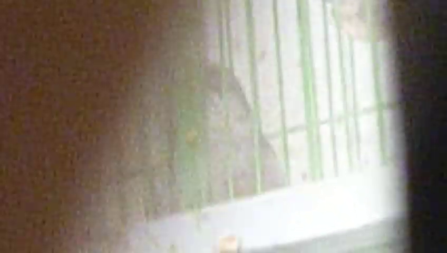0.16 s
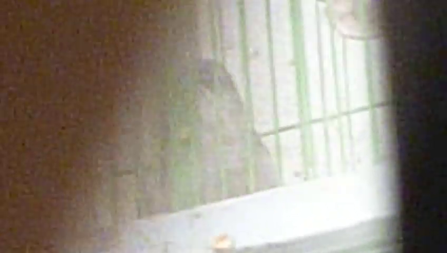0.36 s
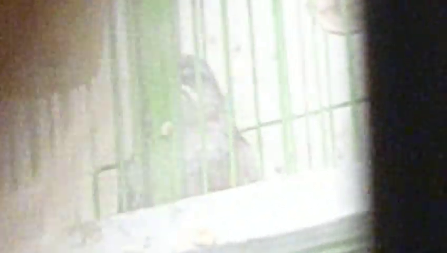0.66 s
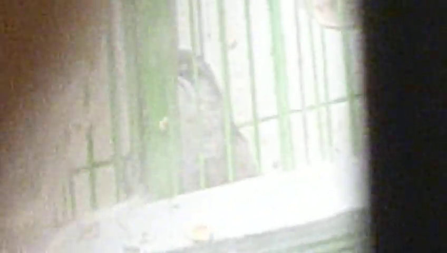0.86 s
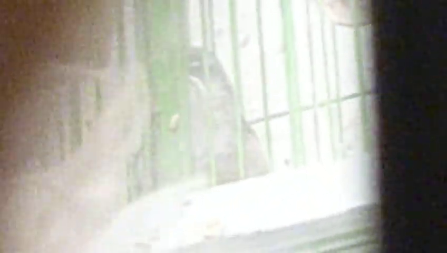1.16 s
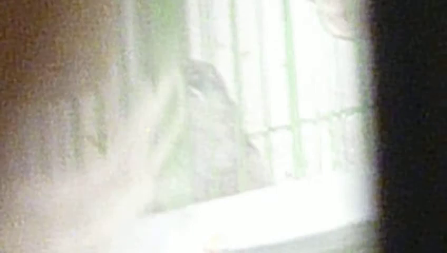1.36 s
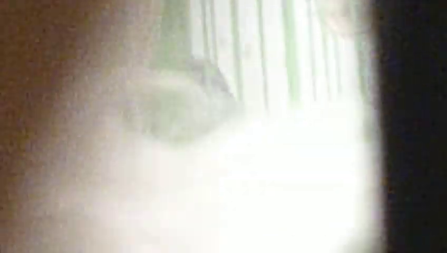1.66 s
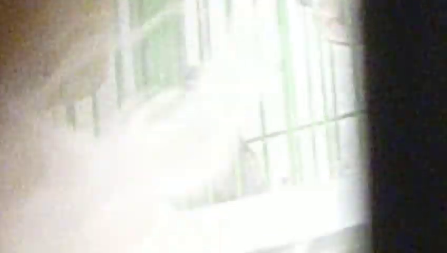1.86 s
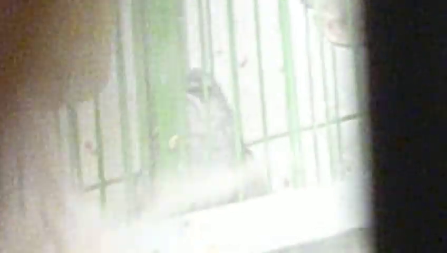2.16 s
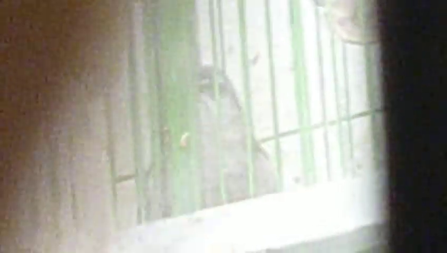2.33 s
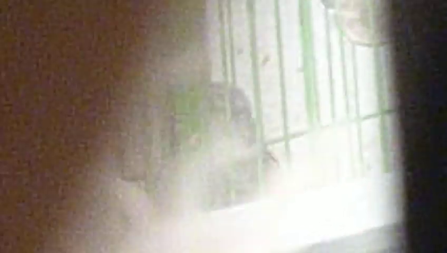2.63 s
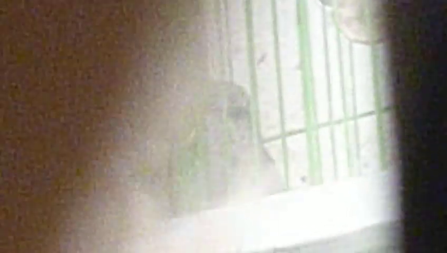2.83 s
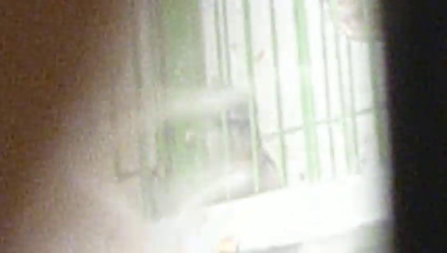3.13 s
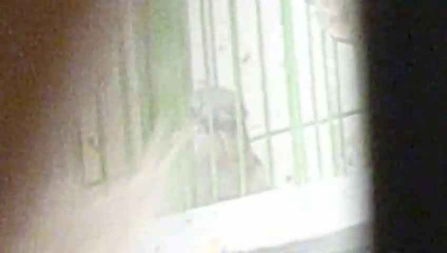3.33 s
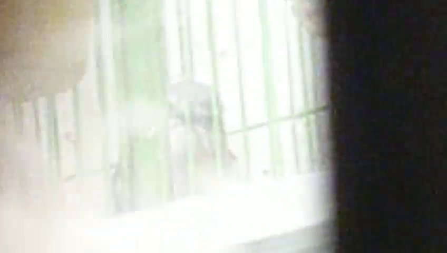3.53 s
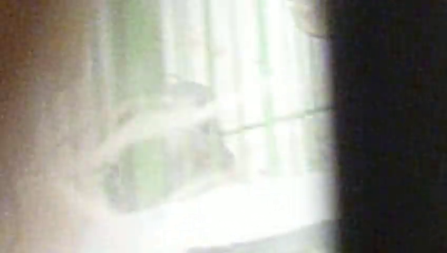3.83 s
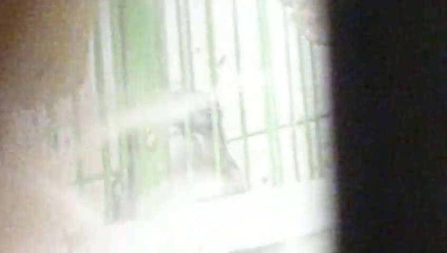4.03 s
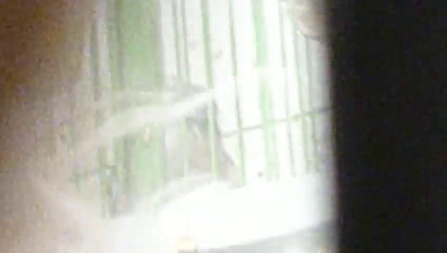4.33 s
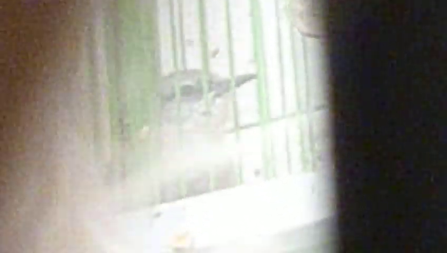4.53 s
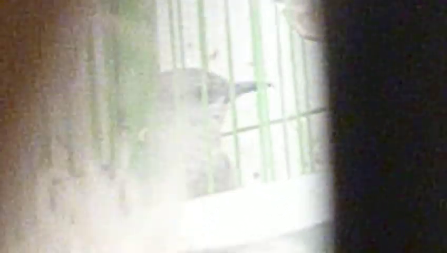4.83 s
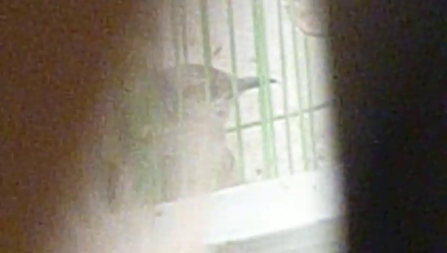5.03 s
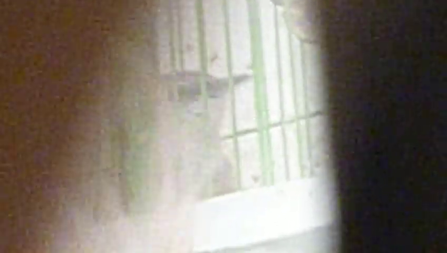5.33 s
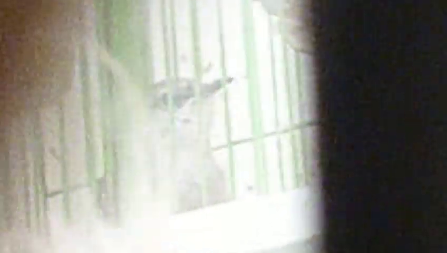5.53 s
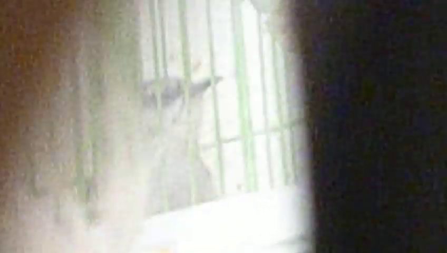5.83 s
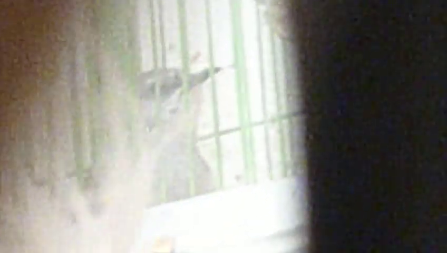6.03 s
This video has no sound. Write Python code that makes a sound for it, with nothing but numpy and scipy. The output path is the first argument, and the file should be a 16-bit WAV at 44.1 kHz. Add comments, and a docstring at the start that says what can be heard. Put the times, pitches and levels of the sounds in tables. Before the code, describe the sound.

Soft, varied chirps and warbles from a caged songbird, each figure repeated a few times, with slight room echo and constant background hiss.

```python
"""Mockingbird in a hard-walled room

A caged mockingbird sings softly a few metres away, repeating each motif a few times: down-slurs and
rasps, arches, dips and buzzes, then quick chips with an upward flick and a thin whistle. Regular
vibration of its syrinx gives gliding tones, chaotic vibration gives rasps, and wall reflections smear
every note. Beneath lie a steady rush, microphone hiss, a faint electronic whine and a few tiny ticks."""
import sys
import numpy as np
from scipy import signal
from scipy.fft import rfft, irfft, next_fast_len
from scipy.io import wavfile
from scipy.ndimage import uniform_filter1d, map_coordinates

SR = 44100
rng = np.random.default_rng(int(sys.argv[2]) if len(sys.argv) > 2 else 0)


def materialize(psi):
    """Save the field psi as 16-bit PCM at rate SR to the path in sys.argv[1].

    A 1-D psi becomes a single channel; in a 2-D psi each row is a channel.
    """
    bounded = np.clip(np.atleast_2d(psi).T, -1, 1)
    quanta = np.round(bounded * 32767).astype(np.int16)
    wavfile.write(sys.argv[1], SR, quanta)


N = 272749

# Spectra of the ambient rush and the microphone hiss: (frequency [Hz], relative density [dB])
RUSH_SPECTRUM = [(20, -20), (45, -12.5), (90, -5.5), (180, 0.5), (350, 0.5), (500, -2.5), (700, -5),
                 (1000, -9), (1500, -16), (3000, -43.5)]
HISS_SPECTRUM = [(300, -1.5), (1200, 2), (1800, 2.5), (3000, -0.5), (4500, -3), (6500, -4.5), (7400, -7),
                 (8000, -12), (8500, -23.5), (8900, -51.5)]
# Reverberation of the room: (frequency [Hz], time to decay by 60 dB [s])
REVERB_TIMES = [(1500, 0.17), (3000, 0.43), (7000, 0.48)]

# Motifs before transposition and stretching, one row a note; UPPER and LOWER are accompanying voices:
# (delay [s], length [s], first pitch [Hz], middle pitch [Hz], last pitch [Hz], relative level [dB],
# roughness [0-1])
SLUR_NOTES = [(-.052, 0.051, 4600, 4740, 5100, -9.5, 0.8), (0, 0.061, 4335, 3980, 3850, -3, 0.13),
              (.032, .025, 3960, 3750, 2840, -0.5, 0.34)]
RASP_NOTES = [(.003, 0.049, 3065, 2600, 2405, 0, 0.65), (0.00041, 0.0409, 1800, 2005, 1860, -4, 0.55)]
ARCH_NOTES = [(-.088, .056, 1910, 2350, 2715, -7, 0.42), (-.045, 0.046, 2920, 3250, 3266, -8, .15),
              (0, .057, 3214, 2932, 2403, -0.2, 0.32)]
ARCH_UPPER_NOTES = [(-.086, .076, 4410, 5120, 6270, 0.0051, 0.76)]
BUZZ_NOTES = [(.003, .062, 2980, 3015, 2960, 0.0031, 0.29)]
BUZZ_LOWER_NOTES = [(.034, .038, 2698, 2647, 2600, 0.0066, .18)]
BUZZ_UPPER_NOTES = [(.01, .055, 6130, 5790, 5710, -0.5, 0.21), (.029, .051, 5480, 5360, 5340, -4.5, 0.24)]
DIP_NOTES = [(0.0049, 0.0527, 2950, 2670, 2630, 0, .2)]
DIP_UPPER_NOTES = [(.005, 0.065, 5660, 5350, 5440, 0, 0.26)]
CHIP_NOTES = [(-.028, .028, 2220, 2510, 2540, -4.5, 0.39), (.002, .019, 2870, 2726, 2460, 1, 0.2),
              (.015, .046, 1988, 1688, 1685, -10.5, .43), (.041, .022, 2774, 2885, 3000, -14, .25)]
FLICK_NOTES = [(0.0036, 0.014, 3050, 3250, 3680, 0.0045, 0.25)]
THIN_NOTES = [(0.028, .049, 6060, 6390, 6840, 0, .2)]
LOW_CHIP_NOTES = [(-.03, .03, 1822, 2323, 2310, -3.5, .27), (0, .013, 2200, 2355, 2368, 2.5, 0.3),
                  (.007, .027, 2345, 1863, 1450, -6.5, .71)]
LOW_FLICK_NOTES = [(0, 0.021, 2920, 2805, 2800, 1, 0.27), (.007, .013, 2950, 3370, 3730, -5.5, 0.31)]
LOW_THIN_NOTES = [(0.033, 0.039, 5250, 5263, 5480, 0, .2)]

# Down-slurs: (time [s], stretch [ratio], level [dB])
SLUR_EVENTS = [(.065, 1.17, -58), (.699, 0.89, -57.5), (1.091, 1.1, -62.5)]
# Electronic impulses: (time [s], height before filtering [dB])
TICK_EVENTS = [(0.1738, -35.5), (0.6963, -38.5), (0.927, -34.5), (1.2249, -36), (1.623, -33),
               (1.8176, -34.5), (1.8785, -42), (2.6654, -38), (3.9248, -34), (4.16, -31.5), (4.2281, -33),
               (4.5814, -37.5), (5.0826, -34), (6.1603, -37.5)]
# Two-voiced rasps: (time [s], pitch [ratio], level [dB])
RASP_EVENTS = [(.202, 0.93, -59.5), (.362, 0.86, -62.5), (.826, 1.02, -61.5), (1.232, 1.04, -56),
               (1.462, 1.088, -57.5), (3.385, 1.03, -63), (3.82, .985, -57.5)]
# Plain whistles among the motifs: (time [s], length [s], first pitch [Hz], last pitch [Hz], level [dB])
WHISTLE_EVENTS = [(1.225, .037, 3080, 3190, -62), (1.413, .016, 4300, 3390, -61.5),
                  (1.426, .053, 3250, 3294, -54), (1.693, 0.039, 5830, 5900, -70.5),
                  (1.96, 0.039, 2900, 2940, -62.5), (2.193, .035, 4470, 4410, -70),
                  (2.375, .046, 4340, 4270, -69.5), (3.622, .035, 2150, 2160, -57),
                  (4.142, 0.028, 3590, 3600, -62), (4.356, 0.07, 4660, 4400, -65.3),
                  (4.436, .068, 4278, 4140, -63.5), (4.46, 0.081, 3596, 3485, -62.3),
                  (5.639, .043, 3780, 3840, -63.5)]
# Arches, timed where the fall begins, and dips, which lead into runs of buzzes:
# (time [s], pitch [ratio], stretch [ratio], level [dB], upper voice level [dB])
ARCH_EVENTS = [(1.809, 1.04, 0.93, -53, -72), (2.068, 1.007, 0.95, -53, -65.5),
               (2.332, .99, 1.13, -54, -74), (2.622, 1.001, 1.05, -53, -63.5)]
DIP_EVENTS = [(2.915, 1.02, 0.7, -60, -74), (3.238, .985, 1.05, -58, -65.5),
              (3.583, 1.038, .96, -59.5, -65), (3.982, 0.95, 1.26, -55, -69)]
# Buzzes: (time [s], pitch [ratio], level [dB], lower voice level [dB], upper voice level [dB])
BUZZ_EVENTS = [(2.746, 0.98, -62, -78.5, -82), (2.796, 1.014, -60.5, -79, -82),
               (2.962, 0.98, -59.5, -58.5, -64.5), (3.055, 0.99, -57.7, -62, -68),
               (3.297, 0.99, -58, -61, -66.5), (3.367, 1, -54, -58, -59.5), (3.645, .994, -61.5, -73, -62),
               (3.718, 1.014, -60, -62.5, -63.5), (3.776, 1.02, -65.5, -67, -64),
               (4.052, .968, -57, -57.5, -64), (4.127, .975, -62.5, -61, -64)]
# Quick chips, and the lower chips that end the phrase:
# (time [s], pitch [ratio], level [dB], flick delay [s], flick level [dB], thin whistle level [dB])
CHIP_EVENTS = [(4.281, 0.99, -49.7, 0.063, -59, -76.5), (4.526, 1.013, -49, 0.06, -53, -67),
               (4.763, .995, -49.5, .06, -53, -65.7), (5.027, .968, -52, 0.059, -53.5, -66.5)]
LOW_CHIP_EVENTS = [(5.279, 0.99, -52.8, 0.062, -56.5, -63.3), (5.526, 1.01, -50.5, 0.052, -53.5, -69),
                   (5.754, 0.98, -53, .064, -54, -62), (6.004, .93, -54, 0.056, -55, -66.5)]


def amp(db):
    """Amplitude ratio of a level in decibels."""
    return 10 ** (np.asarray(db) / 20)


def unit(x):
    """Normalisation to an rms of 1."""
    return x / np.sqrt(np.mean(x ** 2) + 1e-20)


def along(points, hz):
    """Interpolation of (frequency [Hz], value) points on a logarithmic frequency axis."""
    frequencies, values = np.transpose(points)
    return np.interp(np.log(hz + 1), np.log(frequencies + 1), values)


def wobble(rate, t):
    """Smooth random modulation: a spline through `rate` random knots a second."""
    return map_coordinates(rng.standard_normal(1024), [t * rate], mode="wrap")


def filtered(x, response):
    """Linear filtering: the spectrum of x is multiplied by a frequency response."""
    size = next_fast_len(N + SR // 2)
    hz = np.fft.rfftfreq(size, 1 / SR)
    return irfft(rfft(x, size) * response(hz), size)[:N]


def add(track, start, sound):
    """Superposition of a sound on the track, from a start time in seconds."""
    part = track[max(round(start * SR), 0):][:len(sound)]
    part += sound[:len(part)]


def noise(spectrum, patchy_db=1):
    """Spectral shaping of white noise, its gain varying in soft patches of time and frequency; rms 1."""
    white = signal.stft(rng.standard_normal(N), nperseg=512)[2]
    patches = uniform_filter1d(rng.standard_normal(white.shape), size=5, axis=0)
    patches = uniform_filter1d(patches, size=14, axis=1)
    patchy = signal.istft(white * amp(patchy_db * unit(patches)), nperseg=512)[1][:N]
    return unit(filtered(patchy, lambda hz: amp(along(spectrum, hz))))


def background(rush_db=-58, hiss_db=-61, whine_hz=6666, whine_db=-82):
    """Noise floor: low ambient rush, microphone hiss and a sinusoidal electronic whine add in power."""
    rush = amp(rush_db) * noise(RUSH_SPECTRUM)
    hiss = amp(hiss_db) * noise(HISS_SPECTRUM)
    whine = amp(whine_db) * np.sqrt(2) * np.sin(2 * np.pi * whine_hz * np.arange(N) / SR)
    return rush + hiss + whine


def syrinx(length, first_hz, middle_hz, last_hz, rough,
           flutter_depth=0.06, octave_db=-30, rasp_db=1, sag_hz=90, edge_share=0.077):
    """Vibration of the syrinx: a periodic, gliding tone gives way to a chaotic rasp as roughness rises."""
    t = np.arange(int(length * SR)) / SR
    progress = t / length
    glide_hz = np.polyval(np.polyfit([0, 0.5, 1], [first_hz, middle_hz, last_hz], 2), progress)
    flutter = 1 + flutter_depth * rough * wobble(420, t)
    phase = 2 * np.pi * np.cumsum(glide_hz * flutter) / SR
    tone = np.sin(phase) + amp(octave_db) * np.sin(2 * phase)
    # Chaotic vibration spreads into a band centred just under the pitch.
    sagged = phase - 2 * np.pi * sag_hz * t
    rasp = wobble(900, t) * np.sin(sagged) + wobble(900, t) * np.cos(sagged)
    rasp_share = np.clip(rough, 0, 1) ** 1.17
    vibration = (1 - rasp_share) * tone + amp(rasp_db) * rasp_share * rasp
    ramp = np.clip(np.minimum(progress, 1 - progress) / edge_share, 0, 1)
    pressure = np.sin(np.pi / 2 * ramp) * amp(3.4 * rough * wobble(170, t))
    return unit(pressure * vibration)


def sing(motif, start, db, pitch=1, stretch=1):
    """Transposition and time scaling of a motif, giving a list of notes as (time [s], sound)."""
    notes = []
    for delay, length, first, middle, last, note_db, rough in motif:
        note = syrinx(stretch * length, pitch * first, pitch * middle, pitch * last, rough)
        notes.append((start + stretch * delay, amp(db + note_db) * note))
    return notes


def slurs():
    """Frequency glide: a hoarse, slightly rising lead-in, then a clearer tone that sinks and drops."""
    notes = []
    for start, stretch, db in SLUR_EVENTS:
        notes += sing(SLUR_NOTES, start, db, stretch=stretch)
    return notes


def diffuse_tail(build_up_s=0.0024):
    """Impulse response of energy 1: reflections build up, then decay exponentially, the lows soonest."""
    hz, t, white = signal.stft(rng.standard_normal(SR // 2), SR, nperseg=256)
    decay = amp(-60 * t / along(REVERB_TIMES, hz)[:, None])
    tail = signal.istft(white * decay, nperseg=256)[1]
    tail *= 1 - np.exp(-np.arange(len(tail)) / (build_up_s * SR))
    return tail / np.linalg.norm(tail)


def room(notes, direct_db=-3.5, reverb_db=-2):
    """Direct plus reverberant field; each note has its own reflections, as when a bird turns its head."""
    song = np.zeros(N)
    for start, note in notes:
        add(song, start, amp(direct_db) * note)
        add(song, start, amp(reverb_db) * signal.fftconvolve(note, diffuse_tail()))
    return song


def ticks():
    """Impulses have broad spectra: dry, single-sample electronic clicks with the top treble rolled off."""
    track = np.zeros(N)
    for start, db in TICK_EVENTS:
        add(track, start, amp([db]))
    return filtered(track, lambda hz: amp(along([(6500, 3.5), (8000, 1.2), (8800, -22)], hz)))


def rasps():
    """Aperiodic vibration: two low, rough voices sound together as bands of noise."""
    notes = []
    for start, pitch, db in RASP_EVENTS:
        notes += sing(RASP_NOTES, start, db, pitch)
    return notes


def plain_whistles(rough=0.14):
    """Linear frequency sweeps of a nearly pure tone."""
    return [(start, amp(db) * syrinx(length, first, (first + last) / 2, last, rough))
            for start, length, first, last, db in WHISTLE_EVENTS]


def warbles(events, motif, upper):
    """Biphonation: a gliding arch or dip sounds with a fainter voice about an octave above it."""
    notes = []
    for start, pitch, stretch, db, upper_db in events:
        notes += sing(motif, start, db, pitch, stretch)
        notes += sing(upper, start, upper_db, pitch, stretch)
    return notes


def buzzes():
    """Beating: a held note interferes with a lower one while a bright voice falls above them."""
    notes = []
    for start, pitch, db, lower_db, upper_db in BUZZ_EVENTS:
        notes += sing(BUZZ_NOTES, start, db, pitch)
        notes += sing(BUZZ_LOWER_NOTES, start, lower_db, pitch)
        notes += sing(BUZZ_UPPER_NOTES, start, upper_db, pitch)
    return notes


def chips(events, chip, flick, thin_whistle):
    """Rapid frequency modulation: a rise and a sharp drop, then an upward flick and a thin whistle."""
    notes = []
    for start, pitch, db, delay, flick_db, whistle_db in events:
        notes += sing(chip, start, db, pitch)
        notes += sing(flick, start + delay, flick_db)
        notes += sing(thin_whistle, start + delay, whistle_db)
    return notes


def scene():
    """Superposition of the reverberant song, the ticks and the noise floor in one channel."""
    notes = slurs() + rasps()
    notes += warbles(ARCH_EVENTS, ARCH_NOTES, ARCH_UPPER_NOTES)
    notes += warbles(DIP_EVENTS, DIP_NOTES, DIP_UPPER_NOTES)
    notes += buzzes()
    notes += chips(CHIP_EVENTS, CHIP_NOTES, FLICK_NOTES, THIN_NOTES)
    notes += chips(LOW_CHIP_EVENTS, LOW_CHIP_NOTES, LOW_FLICK_NOTES, LOW_THIN_NOTES)
    notes += plain_whistles()
    return (room(notes) + ticks() + background())[None]


def record(dry):
    """Band limiting and DC offset: nothing passes above the cutoff, and the converter rests off zero."""
    cutoff_hz, dc_offset = 8850, -0.054
    return filtered(dry[0], lambda hz: hz < cutoff_hz)[None] + dc_offset


dry = scene()
out = record(dry)
materialize(out)
```